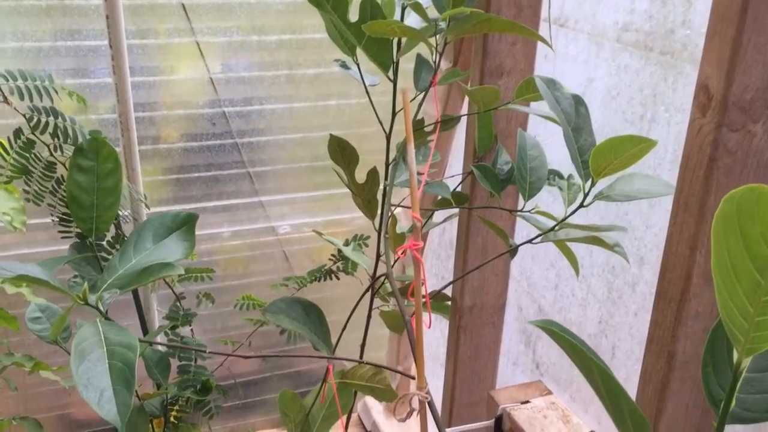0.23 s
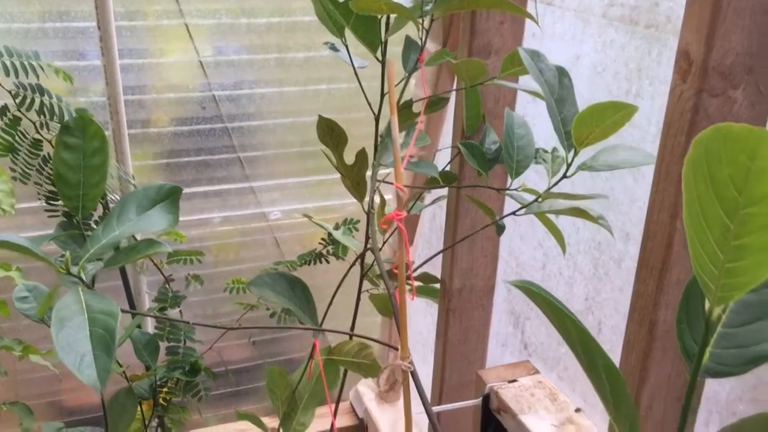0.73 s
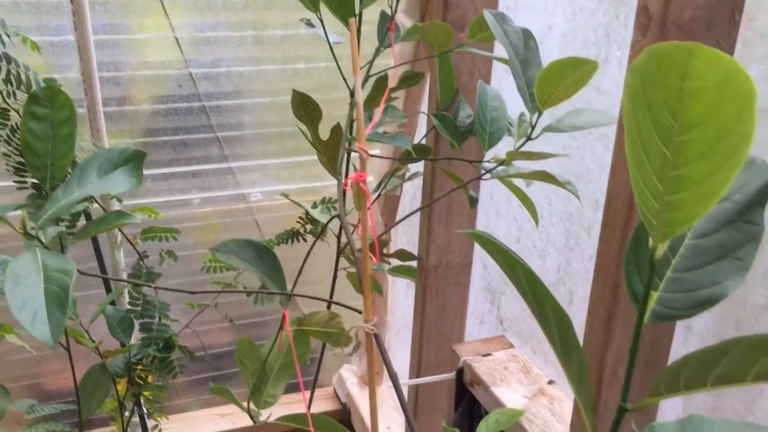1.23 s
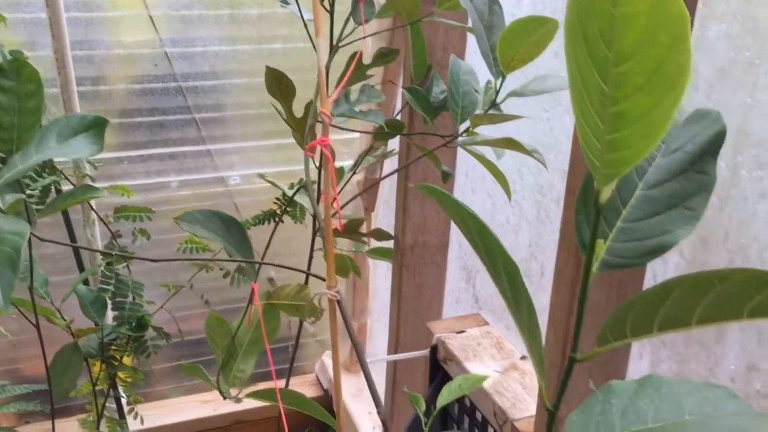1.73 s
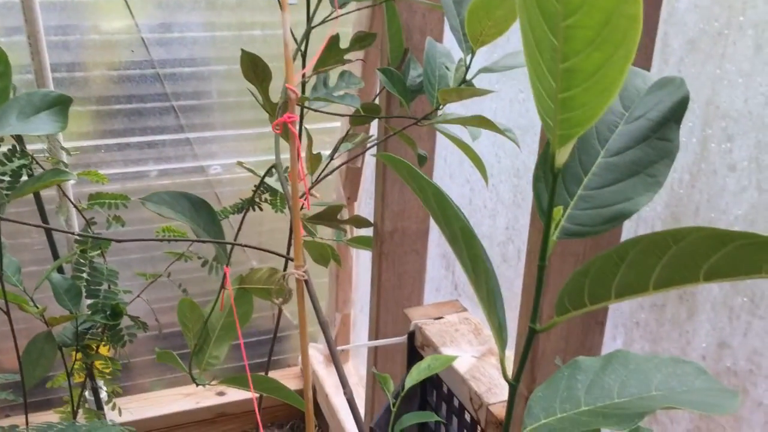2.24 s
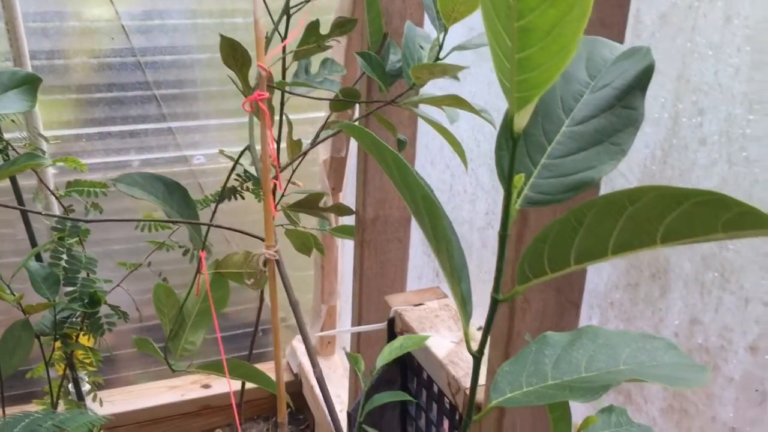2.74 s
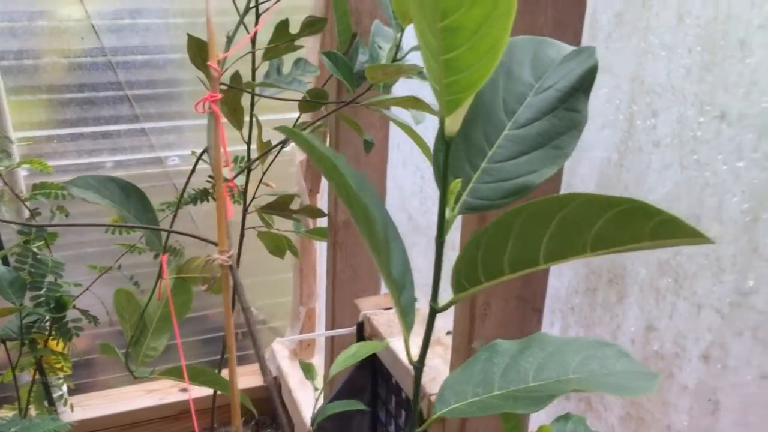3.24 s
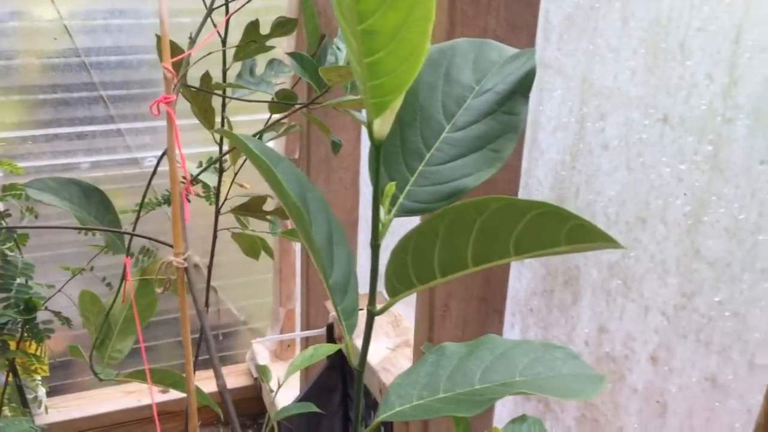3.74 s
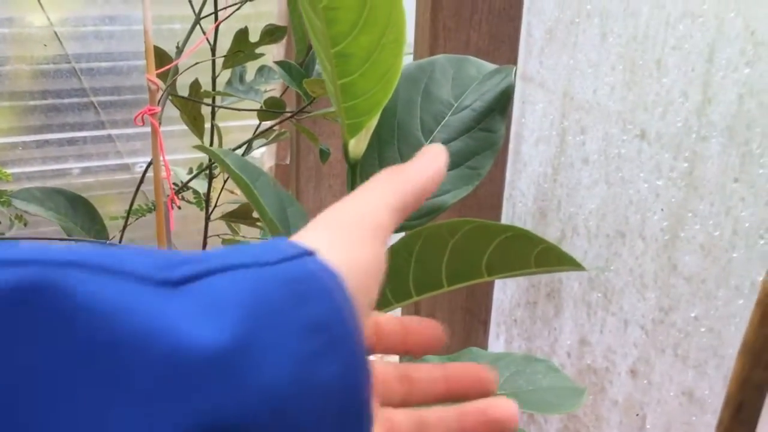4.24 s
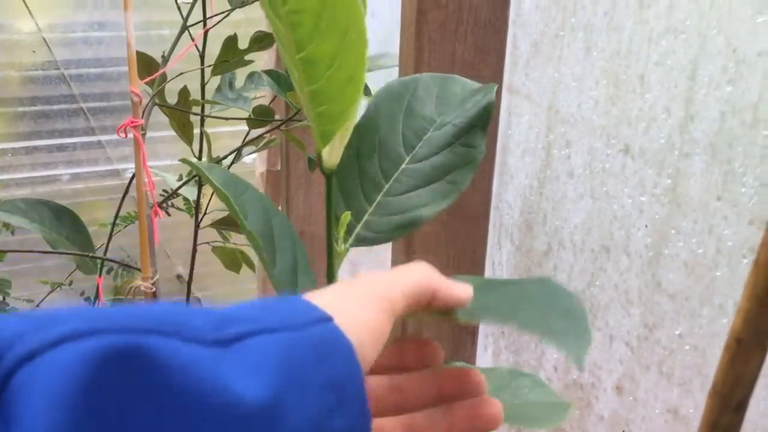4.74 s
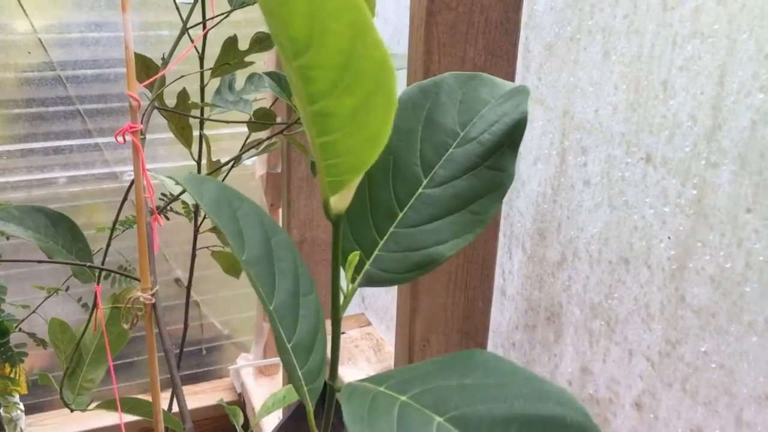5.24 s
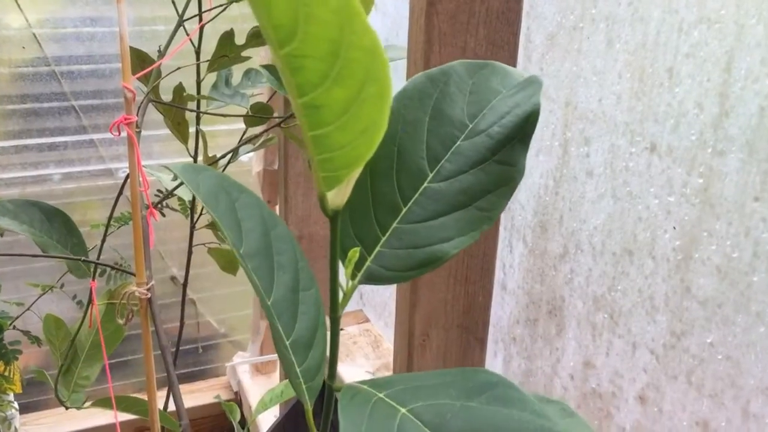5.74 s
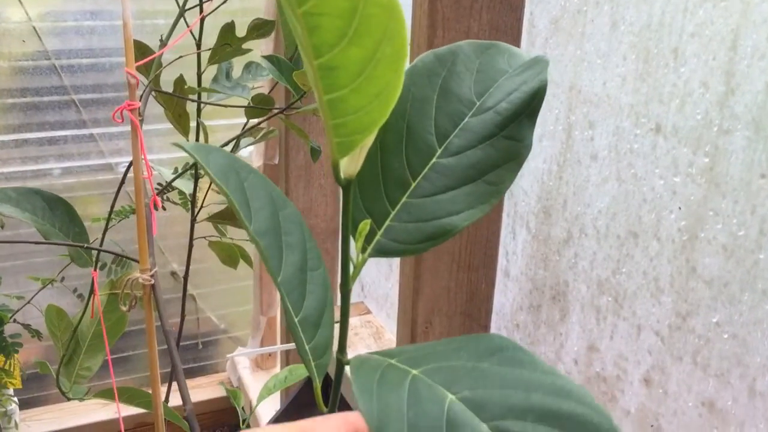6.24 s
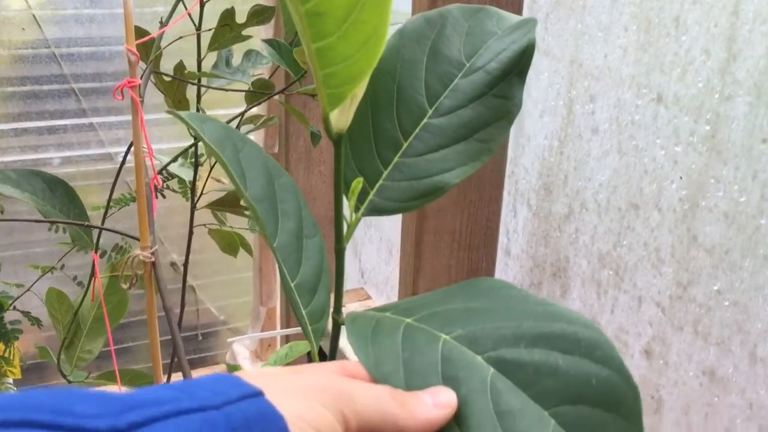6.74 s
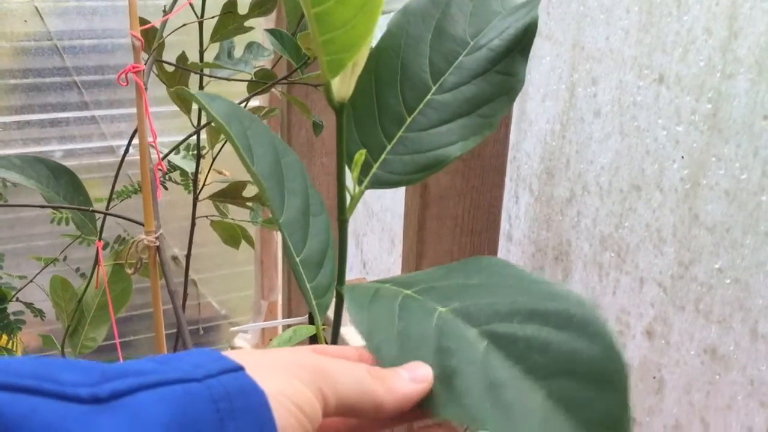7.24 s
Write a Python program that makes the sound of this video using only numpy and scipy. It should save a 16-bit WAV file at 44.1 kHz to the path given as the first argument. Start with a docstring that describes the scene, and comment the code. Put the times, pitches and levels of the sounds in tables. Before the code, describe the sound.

Inside a plastic greenhouse, sharp rain taps snap and rattle overhead at uneven intervals, with a sleeve rustle and small leaf tick midway.

```python
"""Heavy drops crack at once on a corrugated plastic greenhouse, heard from inside among the plants.
Each is a snap, a fast crack and a noisy sheet ring over a pitched thud; far drops arrive blurred and dull.
Fine drops patter and droplets tick between them, over the noise wash of rain outside.
A wall sheet booms softly once (decaying sine) and a faint wavering hum comes up and stays.
A sleeve brushes past (uneven hiss) as a hand reaches for a leaf and flicks it (noise tick)."""
import sys
import numpy as np
from scipy import signal
from scipy.fft import irfft
from scipy.io import wavfile

SR = 44100
rng = np.random.default_rng(int(sys.argv[2]) if len(sys.argv) > 2 else 0)


def pcm_store(signal):
    """Save signal as 16-bit PCM."""
    levels = np.round(np.clip(np.atleast_2d(signal), -1, 1) * 32767)
    wavfile.write(sys.argv[1], SR, levels.astype(np.int16).T)


N = 330309  # samples

# Heavy drops; level before the common trim, thud and splash relative to the 3860 Hz range:
# start_s, level_db, thud_db, splash_db, rise_s, crack_over_ring_db, thud_hz, spot_hz
HEAVY_DROPS = [(0, -39.5, 2, 11.5, 0.00045, 6, 343, 2680), (0.0524, -41, -10.5, 8, 0.0018, 11, 269, 785),
               (0.074, -52.5, 0, -20, 0.00076, 14.5, 413, 860),
               (0.1602, -32.5, -14, -20, 0.0042, -14, 300, 3100),
               (0.2102, -44, -7, 4.5, 0.00043, 3, 250, 1020), (0.249, -66.5, 18, -4, 0.00098, 16, 111, 640),
               (.375, -60.5, -13, -17, 0.0018, 13.5, 243, 630),
               (0.47, -50.5, 9, -18, 0.0013, 8, 117.5, 755), (0.519, -49, 7, 6, 0.0032, -4, 270, 6260),
               (.543, -36.5, -10.5, 2, 0.00043, 8, 355, 567), (0.6235, -36, -2, -0.5, 0.0056, 2, 373, 870),
               (0.6411, -36.5, -8.5, -42, 0.0018, 2, 420, 580),
               (0.8169, -44.5, -5, -11, 0.00056, 12.5, 430, 2700),
               (0.8658, -56, 11.5, -1, .005, 11, 357, 960), (1.095, -50, -8, -33, 0.0033, 2, 97, 1030),
               (1.1283, -61, 19, -20, 0.0014, 9.5, 179, 1110),
               (1.2141, -31, -5.5, -7, 0.013, -16, 200, 1840),
               (1.2833, -30.5, -7, 3.5, 0.0024, -12, 197, 3000),
               (1.445, -44, -5.5, -8, 0.0016, -0.5, 435, 1110), (1.544, -46.5, 9, -2, .012, 6.5, 222, 840),
               (1.6697, -44, 2, -5, 0.0021, 3.5, 250, 804), (1.683, -41.5, 2, -1, 0.0017, 7.5, 429, 910),
               (1.8835, -58, 14, 5, 0.0021, 10.5, 303, 1140),
               (1.959, -47.5, -4, -21, 0.012, -11, 210, 4300),
               (2.011, -29.5, -4.5, -4, 0.012, -17, 233, 2900), (2.139, -53, 3, -16, 0.0068, -3, 240, 3280),
               (2.2937, -26, -8.5, 1, 0.0061, 3.5, 373, 734), (2.4277, -50, 6.5, -1, 0.0009, 5, 424, 600),
               (2.488, -37, -3, 3, 0.012, 2, 405, 910), (2.5945, -25.5, -8, 2.5, 0.00073, 5.5, 318, 1430),
               (2.713, -47, 6, -4, .0013, 3.5, 313, 1930), (2.814, -52, 16.5, -5, 0.0021, -7, 161, 575),
               (2.8404, -37, -4, 8, 0.03, -5, 213, 1960), (2.9289, -31, -21, 1, 0.00079, 0, 405, 1070),
               (2.9483, -46, 0, 8, 0.0022, 11, 303, 950), (3.193, -52, -6, -23, 0.025, 4, 230, 700),
               (3.286, -55.5, 5.5, -12, 0.006, 4, 153, 890), (3.522, -50.5, 20.5, 6, 0.0046, -7, 251, 5350),
               (3.583, -42, 7, -9, 0.024, 1, 192, 694), (3.7757, -33.5, -3, 2.5, 0.011, 7, 268, 1210),
               (3.882, -25.5, -4, 3, 0.0002, 3.5, 293, 7850), (4.004, -31, -3, 3, 0.0022, -11, 194, 2600),
               (4.082, -36.5, 1.5, -9, 0.0069, -6, 154, 1830),
               (4.283, -41, -1.5, -14, 0.016, -10, 337, 640), (4.306, -45.5, 9.5, -2, .001, 7, 231, 1740),
               (4.378, -49.5, 6.5, 8, 0.0011, 7.5, 221, 734), (4.5125, -34, 4.5, 1, 0.093, -10, 303, 1030),
               (4.605, -45, 10.5, -1, 0.0021, -12, 302.5, 623),
               (4.655, -49, -20, -2, 0.0021, 5.5, 205, 593),
               (4.825, -32.5, -6.5, 3.5, 0.0058, 6, 182, 5650),
               (4.955, -26, -8.5, 0.5, 0.0045, 5, 216, 1160), (5.0484, -37, -8, 5, .0016, 6, 334, 1570),
               (5.1965, -24.5, -7, 0, 0.0013, 8.5, 395, 3150),
               (5.388, -37.5, -4.5, -1.5, 0.0016, -6, 353, 5360),
               (5.4668, -49.5, -6, -1, 0.0016, 8.5, 306, 6000), (5.515, -40, -2, -9, 0.045, 8, 234, 560),
               (5.619, -42, 4.5, -5, 0.0078, -7, 204, 900), (5.746, -57.5, 16.5, 1, 0.0014, -13, 159, 540),
               (5.77, -41, -9, -2, 0.0069, -5, 233, 3530), (5.806, -40.5, 4.5, -8, 0.0024, -13, 164, 2600),
               (5.881, -35, -3.5, 1, 0.0019, 3.5, 310, 6400),
               (6.0115, -40.5, 5, -0.5, 0.0019, 10.5, 289, 1720),
               (6.041, -45, -13, -13, 0.0013, 7, 226, 845), (6.1659, -39.5, -3, -0.5, 0.0046, 9, 222, 1560),
               (6.2564, -62, 22.5, -8, 0.0018, -9, 215, 400), (6.318, -54, 13, 4, 0.00068, -0.5, 213, 680),
               (6.3668, -38.5, -0.5, -6.5, 0.0069, 9, 349, 1960),
               (6.471, -49, -28, -4, 0.0027, -12, 98, 734), (6.552, -34.5, -7, -2.5, 0.0013, 9, 367, 6700),
               (6.6169, -46.5, 9, -18, 0.00077, -5, 213, 2200),
               (6.6654, -41.5, 14, -1, 0.0039, -5, 231, 1250),
               (6.7916, -43.5, 3.5, -8.5, 0.0036, -1, 405, 5500), (6.885, -42, 0, -8, 0.017, -10, 337, 620),
               (7.037, -39.5, 10.5, -1, 0.0082, -15, 284.6, 2140),
               (7.13, -56, 18.5, -3, .015, -8, 250, 290), (7.198, -41, -4, -4, 0.0056, 2, 296, 3070),
               (7.278, -51, 18.5, -25, 0.02, -9, 302.4, 570),
               (7.3645, -34.5, -1.5, -14, 0.0057, 9.5, 287, 1590),
               (7.448, -42, -6, -12, .0054, -10, 249, 1120)]
# Broad spectrum radiated by a struck sheet: freq_hz, density_db_per_hz
SHEET_COLOUR = [(25, -31), (55, -4.5), (110, 3.5), (220, 1.5), (400, 3.5), (520, 0.5), (1100, -3),
                (2000, -2.5), (3700, 1), (4700, -5), (6500, -7.5), (7800, -16.5), (10500, -25),
                (15500, -30)]
# Resonances shared by all sheets: freq_hz, width_hz, lift_db
SHEET_RESONANCES = [(220, 39, 4), (296, 43, 3.5), (374, 33, -0.5), (547, 70, 1), (980, 180, 2),
                    (1277, 126, 7), (1456, 220, 2.5), (2560, 60, -1), (3280, 24, 2), (4090, 71, 2.5),
                    (5900, 950, 4.5), (7120, 120, -6), (8900, 940, 3)]
# Relative spectrum of rain outside and the ground's rumble: freq_hz, density_db_per_hz
WASH_COLOUR = [(25, -20), (55, 2.5), (130, -6), (250, -2.5), (400, -10), (1000, -9), (2000, -16),
               (4000, -14.5), (6500, -20), (9000, -28), (15500, -34)]
# Sleeve brushing by: time_s, level_db
SLEEVE_LEVEL = [(3.95, -49), (4.1, -51), (4.2, -53.5), (4.278, -57), (4.4, -69), (4.5, -65)]
# Frequency ranges of a sheet:
# centre_hz, ring_time_ratio (to the drop's t60), crack_t60_s, shortest_rise_s, main_mode_share (0-1)
SHEET_RANGES = [(226, 1.12, 0.12, 0.0011, 0.27), (1080, 1.0, 0.1, 0.00098, 0),
                (3860, 1.0, 0.03, 0.00022, 0), (10600, .8, 0.037, 0.00023, 0)]

TAP_SAMPLES = 16384
LEAD_S = 0.008  # the frame carries a faint part of each blow ahead of the air
USUAL_DB = -33  # middling drop; force is counted from here
# Faint drops are heard more through the room and linger.
RING_T60_S, RING_DOUBLINGS_PER_DB = 0.24, 0.0128
# A light drop rings only its spot; a hard one drives the whole sheet.
SPOT_LIFT_DB, SPOT_LOSS_PER_DB = 7.5, 0.21
# The midrange knock follows the thud up to a ceiling; hard blows are brighter and knock less.
KNOCK_DB, KNOCK_PER_THUD_DB, KNOCK_LOSS_PER_DB, KNOCK_MAX_DB = 1.8, 0.38, 0.0849, 3.5
# Extra gain of first contact at 0 dB crack, and its doublings per dB of crack.
SNAP_GAIN, SNAP_DOUBLINGS_PER_DB = 1.65, 0.1009


def undb(db):
    """Decibels to gain."""
    return 10 ** (np.asarray(db) / 20)


def bins(size):
    """Frequency of each spectral line, at least 1 Hz."""
    return np.maximum(np.arange(size // 2 + 1) * SR / size, 1)


def along(hz, points_hz, values):
    """Straight lines on a log-frequency axis."""
    return np.interp(np.log(hz), np.log(points_hz), values)


def noise(gain, size):
    """Random-phase noise of rms 1 with the given spectrum."""
    x = irfft(gain * np.exp(2j * np.pi * rng.random(len(gain))), size)
    return x / x.std()


def decay(t, t60_s):
    """Exponential fall of 60 dB in t60_s."""
    return np.exp(-np.log(1000) * t / t60_s)


def peak(offset, width):
    """Resonance bump of height 1."""
    return 1 / (1 + (2 * offset / width) ** 2)


def wiggle(step, size):
    """A random value every step places, joined by straight lines; spread near 1."""
    values = rng.standard_normal(size // 4)
    return np.interp(np.arange(size) / step, np.arange(len(values)), values)


def walk(rate_hz):
    """Slow chance over the whole scene."""
    return wiggle(SR / rate_hz, N)


def add(track, start_s, sound):
    """Mix a sound in at a time, cut at the scene's ends."""
    start = int(start_s * SR)
    piece = sound[max(-start, 0):max(N - start, 0)]
    first = max(start, 0)
    track[first:first + len(piece)] += piece


def wash(level_db=-62, sway_db=0.5):
    """Rain on the garden, muffled by the walls: nearly steady coloured noise."""
    hiss = noise(undb(along(bins(N), *np.transpose(WASH_COLOUR))), N)
    return hiss * undb(level_db + sway_db * walk(4.8))


def hum(pitch_hz=232, level_db=-64, start_s=2.3, fade_s=0.5, waver_db=3, drift_hz=3):
    """A sine of drifting pitch and wavering level comes up and stays."""
    fade = np.clip((np.arange(N) / SR - start_s) / fade_s, 0, 1)
    phase = 2 * np.pi * np.cumsum(pitch_hz + drift_hz * walk(9)) / SR
    return fade * undb(level_db + waver_db * walk(25)) * np.sin(phase)


def wall_boom(start_s=1.98, mode_hz=55, level_db=-49, rise_s=0.012, t60_s=1.0):
    """A whole wall sheet flexes in its lowest mode: a decaying sine."""
    t = np.maximum(np.arange(N) / SR - start_s, 0)
    envelope = (1 - np.exp(-t / rise_s)) * decay(t, t60_s)
    return undb(level_db) * envelope * np.sin(2 * np.pi * mode_hz * t)


def sleeve(centre_hz=4000, width_hz=4500, grain_db=2):
    """Jacket cloth sliding: an uneven hiss."""
    points = np.transpose(SLEEVE_LEVEL)
    level_db = np.interp(np.arange(N) / SR, *points, left=-np.inf, right=-np.inf)
    hiss = noise(peak(bins(N) - centre_hz, width_hz), N)
    return hiss * undb(level_db + grain_db * walk(88))


def click(low_hz, high_hz, t60_s, size=4096):
    """A dry tick close by, too small to stir the room: decaying band noise."""
    hz = bins(size)
    band = 1 / np.sqrt((1 + (low_hz / hz) ** 6) * (1 + (hz / high_hz) ** 8))
    return noise(band, size) * decay(np.arange(size) / SR, t60_s)


def leaf_flick(start_s=4.1092, level_db=-27.5, low_hz=700, high_hz=3400, t60_s=0.02):
    """The reaching hand flicks a stiff leaf: one tick."""
    out = np.zeros(N)
    add(out, start_s, undb(level_db) * click(low_hz, high_hz, t60_s))
    return out


def specks(count=45, lowest_db=-58, span_db=4, middle_hz=2600, t60_s=0.02):
    """Splashed droplets tick on the nearest wall, up to an octave either side of middle_hz."""
    out = np.zeros(N)
    for when, size, pitch in rng.random((count, 3)):
        centre_hz = middle_hz * 2 ** (2 * pitch - 1)
        tick = click(centre_hz / 2, centre_hz * np.sqrt(2), t60_s)
        add(out, when * N / SR, undb(lowest_db + span_db * size) * tick)
    return out


def sheet_db(hz):
    """Broad colour of the plastic with its resonances on top."""
    resonances = sum(lift_db * peak(hz - f, width) for f, width, lift_db in SHEET_RESONANCES)
    return along(hz, *np.transpose(SHEET_COLOUR)) + resonances


def spot_db(hz, spot_hz, lift_db, width_ratio=0.12, uneven_db=3.5, spacing_hz=90):
    """Each struck spot favours one resonance and feeds the sheet's many other modes unevenly."""
    uneven = wiggle(spacing_hz * TAP_SAMPLES / SR, len(hz)) * hz / (hz + spacing_hz * 10)
    return lift_db * peak(hz / spot_hz - 1, width_ratio) + uneven_db * uneven


def tap(colour_db, thud_db, knock_db, splash_db, rise_s, crack_db, t60_s, thud_hz, spot_hz, lift_db,
        snap_gain=2, snap_s=0.00065, early_db=-27, echo_db=2.0, echo_s=0.003896):
    """One drop: a snap, a fast crack, then the dense ring of the sheet over a pitched thud."""
    hz, clock = bins(TAP_SAMPLES), np.arange(TAP_SAMPLES) / SR
    t = np.maximum(clock - LEAD_S, 0)
    centres_hz = np.transpose(SHEET_RANGES)[0]
    balance_db = along(hz, centres_hz, [thud_db, knock_db, 0, splash_db])
    power = undb(colour_db + spot_db(hz, spot_hz, lift_db) + balance_db) ** 2
    power = power / power[(hz > 2000) & (hz < 7000)].sum()
    mode = np.sqrt(2) * np.sin(2 * np.pi * thud_hz * t)
    early = undb(early_db) * np.minimum(clock / LEAD_S, 1)
    contact = 1 + snap_gain * np.exp(-t / snap_s)
    out = 0
    for weight, sheet_range in zip(np.eye(len(SHEET_RANGES)), SHEET_RANGES):
        _, ring_ratio, crack_t60_s, shortest_rise_s, tonal = sheet_range
        part = power * along(hz, centres_hz, weight)
        # bending waves from a far spot spread on their way, slowing the attack; the bass arrives last
        attack = 1 - np.exp(-t / np.hypot(rise_s, shortest_rise_s))
        ring, crack = decay(t, t60_s * ring_ratio), decay(t, crack_t60_s)
        # returns from the sheet's edges and the walls, as random lumps
        texture = contact * undb(echo_db * wiggle(echo_s * SR, TAP_SAMPLES))
        envelope = (early + attack * texture) * np.hypot(ring, undb(crack_db) * crack)
        rattle = noise(np.sqrt(part), TAP_SAMPLES)
        wave = envelope * (np.sqrt(1 - tonal) * rattle + np.sqrt(tonal) * mode)
        # hold each range to its exact energy
        out = out + wave * np.sqrt(part.sum() * np.sum(envelope ** 2) / np.sum(wave ** 2))
    return out


def patter(colour_db, count=80, mean_db=-66, spread_db=2.5, thud_db=2, splash_db=-8, rise_s=0.0023,
           crack_db=9, t60_s=0.7, thud_hz=270, spot_hz=2400, lift_db=10):
    """Fine drops all over the roof, each with its own size and place; far ones are blurred and dull."""
    out = np.zeros(N)
    times_s = (np.arange(count) + rng.random(count)) * N / SR / count
    traits = np.clip(rng.standard_normal((count, 6)), -2, 2)
    for start_s, (size, low, mid, far, span, spot) in zip(times_s, traits):
        balance_db = thud_db + 4 * low, 3 * mid, splash_db - 2 * far
        pitch_hz, place_hz = thud_hz * 2 ** (0.74 * span), spot_hz * 2 ** (0.68 * spot)
        drop = tap(colour_db, *balance_db, rise_s * np.exp(far), crack_db, t60_s,
                   pitch_hz, place_hz, lift_db)
        add(out, start_s, undb(mean_db + spread_db * size) * drop)
    return out


def blow(level_db, thud_db, splash_db, rise_s, crack_db, thud_hz, spot_hz):
    """Knock, ring time, spot resonance and snap follow from a drop's force, thud and crack."""
    force_db = level_db - USUAL_DB
    knock_db = KNOCK_DB + KNOCK_PER_THUD_DB * thud_db - KNOCK_LOSS_PER_DB * force_db
    knock_db = min(knock_db, KNOCK_MAX_DB)
    t60_s = RING_T60_S * 2 ** (-RING_DOUBLINGS_PER_DB * force_db)
    lift_db = SPOT_LIFT_DB - SPOT_LOSS_PER_DB * force_db
    snap_gain = SNAP_GAIN * 2 ** (SNAP_DOUBLINGS_PER_DB * crack_db)
    return thud_db, knock_db, splash_db, rise_s, crack_db, t60_s, thud_hz, spot_hz, lift_db, snap_gain


def heavy_drops(colour_db, trim_db=-0.38):
    """The drops that stand out, each striking its own spot of a sheet."""
    out = np.zeros(N)
    for start_s, level_db, *place in HEAVY_DROPS:
        drop = tap(colour_db, *blow(level_db, *place))
        add(out, start_s - LEAD_S, undb(level_db + trim_db) * drop)
    return out


def scene():
    """Everything at one microphone."""
    colour_db = sheet_db(bins(TAP_SAMPLES))
    rain = wash() + specks() + patter(colour_db) + heavy_drops(colour_db)
    return (rain + hum() + wall_boom() + sleeve() + leaf_flick())[None]


def record(dry, low_hz=43, top_hz=15700):
    """The microphone loses the deepest bass; the recorder cuts the top."""
    high_pass = signal.butter(4, low_hz, "high", fs=SR, output="sos")
    low_pass = signal.ellip(10, 0.1, 80, top_hz, fs=SR, output="sos")
    return signal.sosfilt(low_pass, signal.sosfilt(high_pass, dry))


dry = scene()
out = record(dry)
pcm_store(out)
```